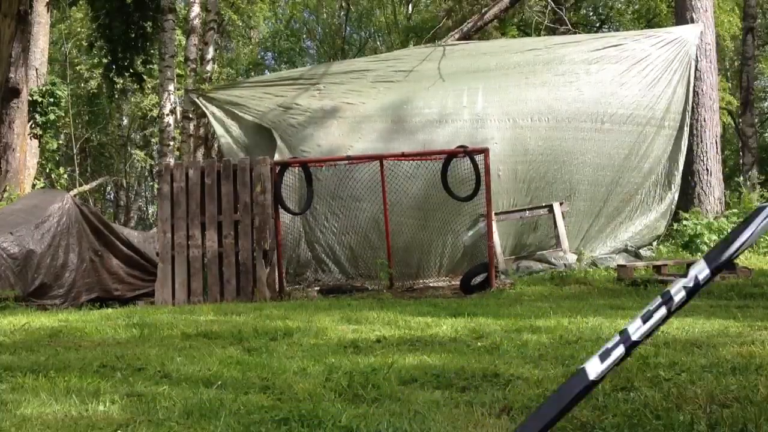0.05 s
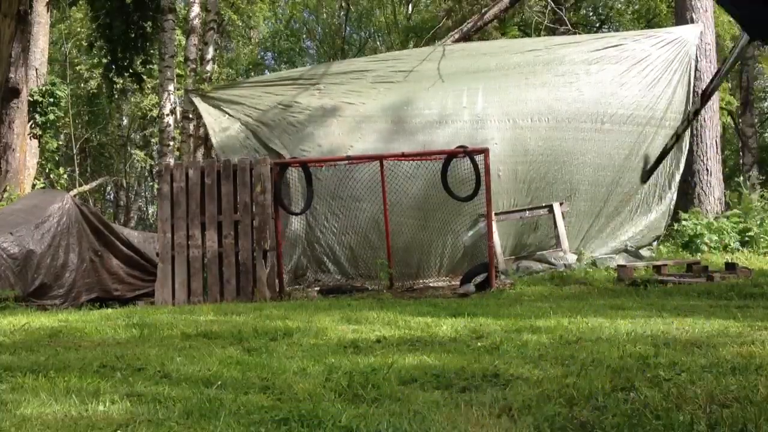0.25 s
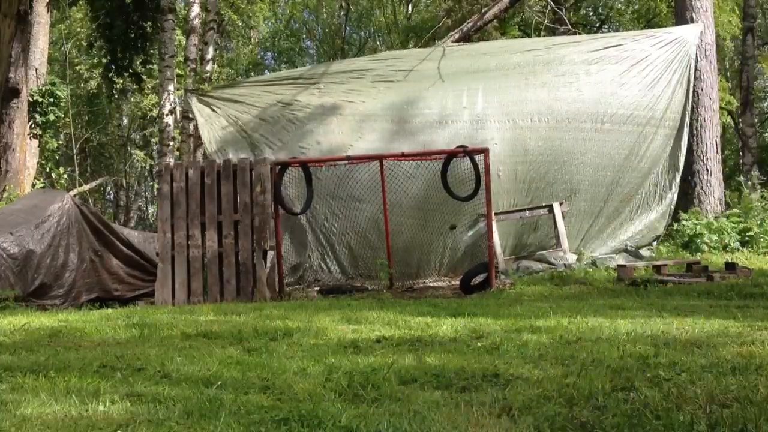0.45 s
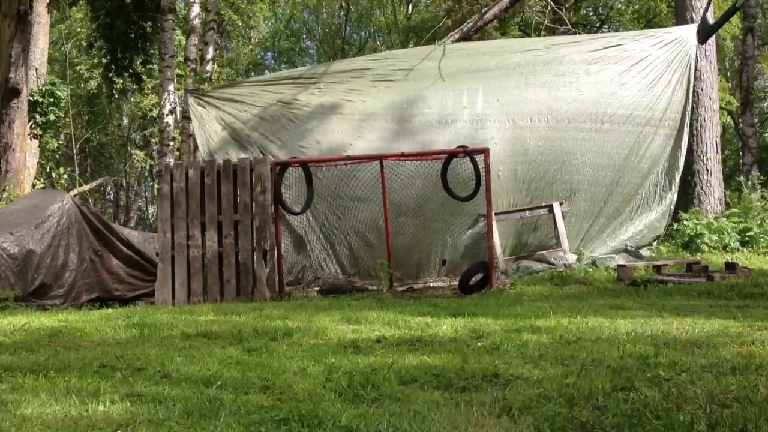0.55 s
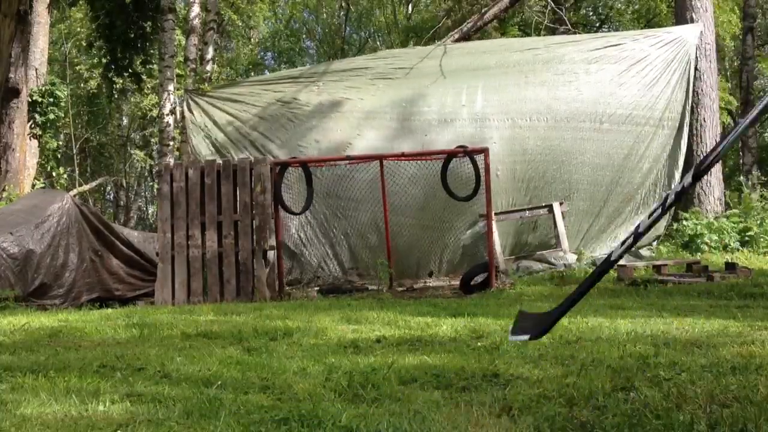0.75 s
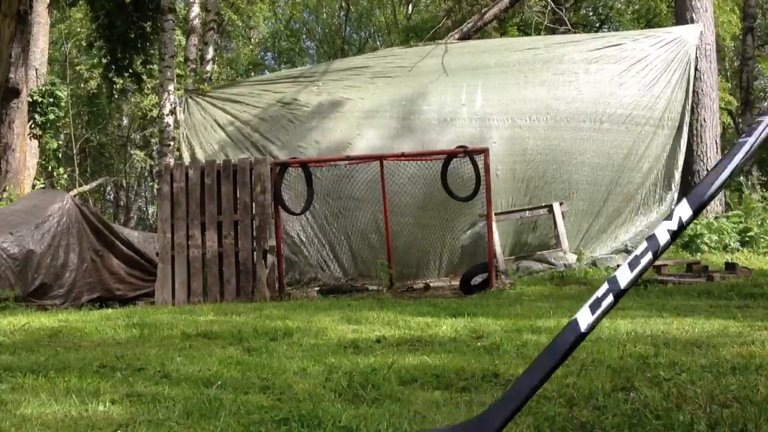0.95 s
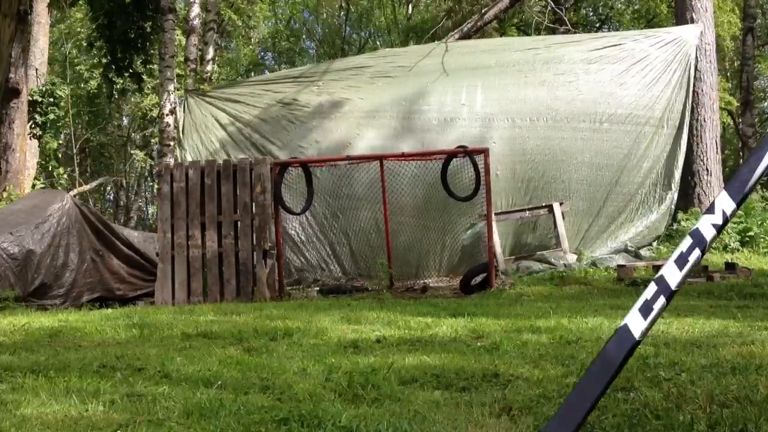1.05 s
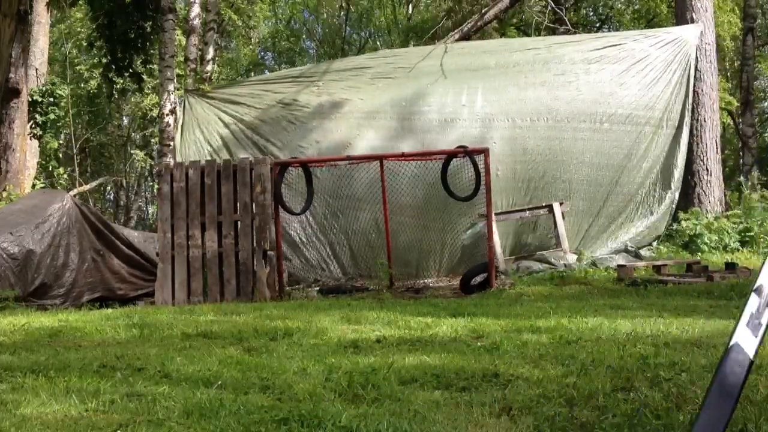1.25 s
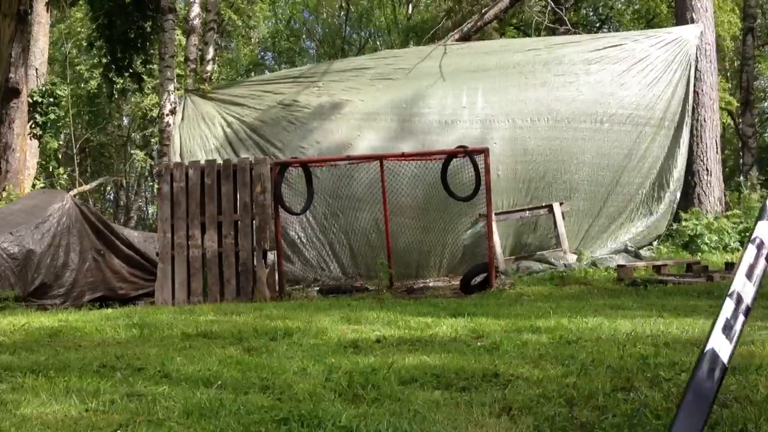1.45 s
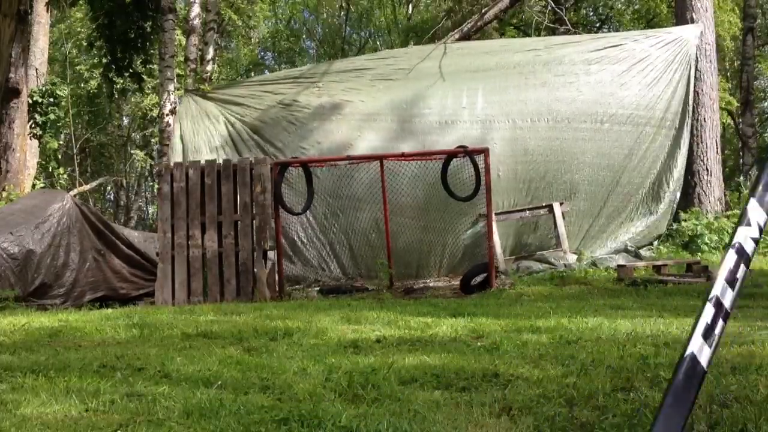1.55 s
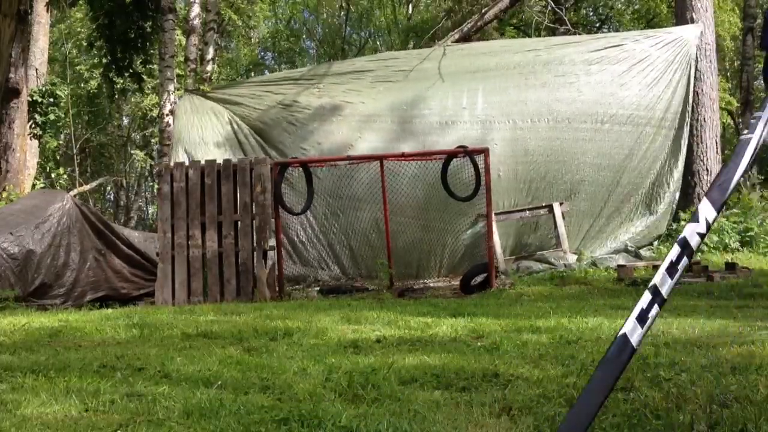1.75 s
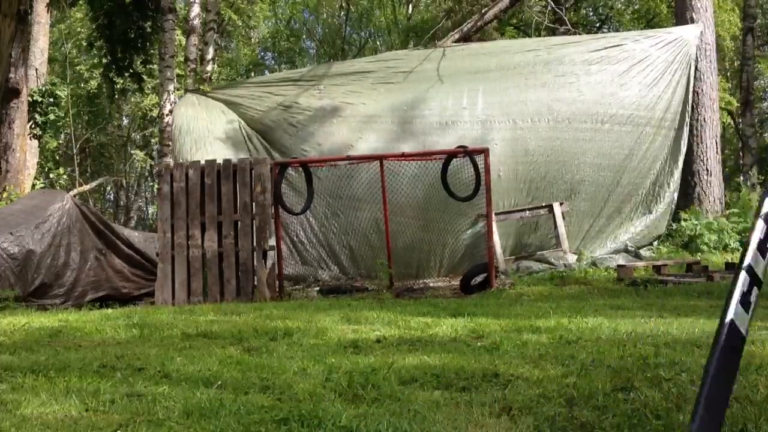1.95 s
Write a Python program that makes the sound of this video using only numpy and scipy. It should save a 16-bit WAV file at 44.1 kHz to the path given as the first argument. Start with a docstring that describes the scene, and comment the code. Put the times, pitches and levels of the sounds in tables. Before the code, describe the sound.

In a quiet yard, a close hockey stick scrapes briefly and cracks against a puck, which hits a rustling tarp farther off. Faint falling bird chirps follow as the stick clacks and scrapes the next puck into place.

```python
"""Backyard hockey shot

A stick blade sweeps a puck over a shooting pad, hissing with friction, and cracks down.
A third of a second later the puck slaps into a hanging tarp, which crinkles and rustles out.
The stick then knocks and drags the next puck into place. Fence and trees scatter the sound,
while a small bird repeats a falling chirp and another whistles faintly over the hush of leaves."""
import sys
import numpy as np
from scipy import signal
from scipy.fft import rfft, irfft, next_fast_len
from scipy.io import wavfile

SR = 44100
rng = np.random.default_rng(int(sys.argv[2]) if len(sys.argv) > 2 else 0)


def pcm_store(signal):
    """Save signal as 16-bit PCM."""
    levels = np.round(np.clip(np.atleast_2d(signal), -1, 1) * 32767)
    wavfile.write(sys.argv[1], SR, levels.astype(np.int16).T)


N = 88200
T = np.arange(N) / SR


def from_db(db):
    """Turn decibels into a number to multiply by."""
    return 10 ** (np.asarray(db) / 20)


def unit_power(x):
    """Scale a sound to an average power of 1."""
    return x / np.sqrt(np.mean(x ** 2) + 1e-20)


def level(rows):
    """Volume that follows (time [s], level [dB]) points and fades beyond both ends."""
    times, db = np.transpose(rows)
    outside_s = np.maximum(times[0] - T, 0) + np.maximum(T - times[-1], 0)
    return from_db(np.interp(T, times, db) - 110 * outside_s)


def colour(x, points):
    """Shape bass and treble to follow (frequency [Hz], level [dB]) points."""
    size = next_fast_len(2 * N)
    hz, db = np.transpose(points)
    grid_hz = np.maximum(np.arange(size // 2 + 1) * SR / size, 1)
    gain = from_db(np.interp(np.log(grid_hz), np.log(hz), db))
    # folding keeps the filter from sounding before its input does
    fold = irfft(np.log(gain), size)
    fold[1:size // 2] *= 2
    fold[size // 2 + 1:] = 0
    return irfft(rfft(x, size) * np.exp(rfft(fold)), size)[:N]


def cut_treble(x, hz, order=1):
    """Turn down what lies above hz."""
    return signal.sosfilt(signal.butter(order, hz, fs=SR, output="sos"), x + 1e-18)


def cut_bass(x, hz, order=2):
    """Turn down what lies below hz."""
    return signal.sosfilt(signal.butter(order, hz, "high", fs=SR, output="sos"), x + 1e-18)


def band(x, low_hz, high_hz, order=2):
    """Keep what lies between two frequencies."""
    return cut_treble(cut_bass(x, low_hz, order), high_hz, order=2)


def resonance(x, hz, width_hz):
    """Keep what lies near one pitch."""
    r = np.exp(-np.pi * width_hz / SR)
    feedback = [1, -2 * r * np.cos(2 * np.pi * hz / SR), r * r]
    return signal.lfilter([1, 0, -1], feedback, x + 1e-18) * (1 - r * r) / 2


def focus(x, hz, width_hz):
    """Resonate twice, for a clearer pitch."""
    return resonance(resonance(x, hz, width_hz), hz, width_hz)


def smear(x, hz, width_hz):
    """A flexing body spreads a click out in time."""
    return x - 2 * resonance(x, hz, width_hz)


def delay(x, seconds):
    """The same sound, later."""
    return np.interp(T - seconds, T, x, left=0)


def click(start):
    """A click one sample long."""
    return 1. * (np.arange(N) == int(start * SR))


def burst(start, fade_s):
    """A puff of noise. Here and below, a fade is the time taken to drop 60 dB."""
    fading = (T >= start) * from_db(-60 * np.maximum(T - start, 0) / fade_s)
    return unit_power(rng.standard_normal(N) * fading) / np.sqrt(N)


def ring(x, hz, fade_s):
    """Each click sets off a pure tone that dies away."""
    r = from_db(-60 / (fade_s * SR))
    feedback = [1, -2 * r * np.cos(2 * np.pi * hz / SR), r * r]
    return signal.lfilter([1, 0, -1], feedback, x / 2 + 1e-18)


def ring_tones(force, tones):
    """A struck object rings with all its own tones at once."""
    return sum(from_db(db) * ring(force, hz, fade_s) for hz, db, fade_s in tones)


def grains(per_s, spread_db, hiss):
    """Tiny random clicks of uneven size over a smooth hiss."""
    sizes = from_db(spread_db * np.minimum(rng.exponential(1, N), 4)) * rng.choice([-1, 1], N)
    clicks = sizes * (rng.random(N) < per_s / SR)
    return unit_power(unit_power(clicks) + hiss * rng.standard_normal(N))


# tone of the background hush (frequency [Hz], level [dB])
AIR_COLOUR = [(15, -76), (25, -34.5), (75, -19.5), (160, 6), (500, 1.5), (895, -4.5), (2770, -7.5),
              (3630, -4), (5140, -8.5), (7300, -10), (9810, -20.5), (14300, -13), (15500, -18)]
def air():
    """Leaves and distant air make a soft, steady noise."""
    return from_db(-68) * unit_power(colour(rng.standard_normal(N), AIR_COLOUR))


# the blade's high resonances (pitch [Hz], width [Hz], strength [times])
FRICTION_PEAKS = [(4200, 300, 0.82), (6580, 500, 1), (7500, 436, 0.17)]
def friction():
    """Rubbing on the pad makes tiny clicks, coloured by the blade."""
    grit = grains(per_s=2900, spread_db=2.0, hiss=0.67)
    return grit + sum(gain * resonance(grit, hz, width) for hz, width, gain in FRICTION_PEAKS)


# how loud the sweep is (time [s], level [dB])
SWEEP_LEVEL = [(0, -63), (0.041, -60.5), (0.048, -51.5), (0.07, -53.5), (0.098, -51), (0.106, -45),
               (0.15, -43.5), (0.18, -50.5), (0.208, -38), (0.228, -57.5), (0.259, -44), (0.286, -58),
               (0.34, -66.5), (0.42, -96)]
# tone of the sweep (frequency [Hz], level [dB])
SWISH_COLOUR = [(59, -42.5), (110, -10), (205, 0), (333, -1), (447, 5.5), (825, -4), (956, -2),
                (2100, -5.5), (6390, -1), (15500, -11)]
def sweep(grit):
    """The blade slides the puck along, sounding brighter the harder it presses."""
    swish = unit_power(colour(grit, SWISH_COLOUR))
    force, half_bright_force = level(SWEEP_LEVEL), from_db(-52.5)
    bright = force ** 2 / (force ** 2 + half_bright_force ** 2)
    return from_db(1) * force * (bright * swish + (1 - bright) * cut_treble(swish, hz=8000))


# tone of the scattered sound (frequency [Hz], level [dB])
SCATTER_COLOUR = [(50, 14), (200, 9.5), (450, 0.5), (1200, -1), (4000, 2.5), (14000, -2)]
def yard_scatter(sound):
    """Fence and trees send back a short blur of echoes."""
    echoes = colour(burst(start=0.014, fade_s=0.26), SCATTER_COLOUR)
    return from_db(-23) * signal.fftconvolve(sound, echoes)[:N]


# tone of the crack (frequency [Hz], level [dB])
CRACK_COLOUR = [(30, -33.5), (105, -25), (180, -11.5), (300, -8.5), (560, 1.5), (1100, -3.5), (1700, -14),
                (2500, -28.5), (3100, -4.5), (4200, -23), (8500, -18.5), (10000, -38.5), (15000, -33.5)]
# tones the blade rings with (pitch [Hz], level [dB], fade [s])
BLADE_TONES = [(227.7, -16.5, 0.028), (382, -13, .04), (558.4, -0.5, 0.057), (727, -8, .045),
               (848, -11, 0.13), (1060, -3.5, 0.04), (1455, -13.5, .03), (1932, -6.5, .036),
               (3130, 0, 0.014), (3563, -20.5, 0.046), (6430, -5.5, 0.015), (8130, -16.5, 0.013)]
# tone of the shot's rattle and of the later knocks (frequency [Hz], level [dB])
CONTACT_COLOUR = [(40, -36.5), (100, -28.5), (190, 1), (600, 0.5), (1500, -5.5), (2700, -9.5), (4200, -6),
                  (8000, -8.5), (15000, -29)]
SHOT_S, BOUNCE_GAP_S, BOUNCE_LOSS_DB = 0.2107, 0.00548, 6.5
def shot():
    """The blade slaps the pad, rings, rattles and bounces twice, weaker and duller each time."""
    hit = click(SHOT_S)
    touch = smear(hit, hz=5430, width_hz=3400)
    force = 0
    for bounce in range(3):
        force += from_db(-BOUNCE_LOSS_DB * bounce) * delay(touch, bounce * BOUNCE_GAP_S)
        touch = cut_treble(touch, hz=7620)
    crack = from_db(20) * colour(force, CRACK_COLOUR)
    ringing = from_db(-21.5) * ring_tones(hit, BLADE_TONES)
    rattle = from_db(6) * colour(burst(SHOT_S, fade_s=0.029), CONTACT_COLOUR)
    return crack + ringing + rattle


def fence_echo(sound):
    """The fence sends back one quiet, duller copy."""
    return from_db(-27.5) * cut_treble(delay(sound, seconds=0.0252), hz=9000)


# hits on the pad; a harder hit reaches a higher top (time [s], click [dB], bottom [Hz], top [Hz],
# ring [dB], rattle [dB], thud [dB], thud pitch [Hz])
PAD_HITS = [(0.256, -7, 1500, 12170, -74, -7.5, -39, 159), (0.277, -13, 1110, 1800, -48.5, -5, -37, 257),
            (1.2939, -4, 647, 1120, -49, -0.5, -46, 440), (1.2999, -1.5, 150, 446, -43.5, 0, -30.5, 264),
            (1.372, -6, 250, 3670, -60, -4, -36.5, 197), (1.3777, -1.5, 350, 2280, -56, -4, -31, 690),
            (1.3836, -1.5, 200, 1080, -43.5, 0, -45, 302), (1.510, -30, 297, 1670, -69, -21, -48, 477),
            (1.5540, -23, 100, 504, -60, -14.5, -46, 173), (1.7122, -0.5, 250, 1330, -38, 0.5, -27.5, 448),
            (1.7196, -10, 201, 1420, -47, 1, -33, 340), (1.729, -2, 400, 1310, -44, -2, -32.5, 280),
            (1.7442, 12, 1110, 2940, -26, 11, -47, 190), (1.7478, 6.5, 770, 2410, -43, 8.5, -20.5, 214),
            (1.7743, -9.5, 300, 4960, -51, -5, -30, 646), (1.7790, -16, 150, 600, -53, -2.5, -32.5, 250),
            (1.7980, -10, 300, 810, -45, -4, -41, 640), (1.9878, -22.5, 70, 178, -64.5, -36, -30.5, 174.5)]
# tones the pad rings with (pitch [Hz], level [dB], fade [s])
PAD_TONES = [(193.6, -5.5, 0.21), (252, -2.5, 0.13), (301, -4, 0.14), (570.5, -4, 0.12), (695, -7.5, 0.14),
             (898, -9.5, 0.045), (1053, -5, .06), (1127, -11, 0.11), (1425, 0, 0.032), (1572, 0.5, 0.04),
             (1865, -2, 0.038), (2080, -2, 0.047), (2335, -12.5, .045), (2650, -4, 0.027), (4250, -1, 0.03)]
def knocks():
    """Stick and puck hit the pad: each hit clicks, rattles, thuds and sets the pad ringing."""
    contact = force = thuds = 0
    for start, click_db, low_hz, top_hz, ring_db, rattle_db, thud_db, thud_hz in PAD_HITS:
        hit = click(start)
        touch = from_db(click_db) * hit + from_db(rattle_db) * burst(start, fade_s=0.048)
        grit = from_db(-19) * (touch - cut_treble(touch, hz=4000))
        contact += band(touch, low_hz, top_hz) + grit
        force += from_db(ring_db) * band(hit, low_hz, top_hz, order=1)
        thud = ring(hit, thud_hz, fade_s=0.035)
        thuds += from_db(thud_db) * band(thud, low_hz=109, high_hz=1.68 * thud_hz, order=1)
    clack = colour(contact, CONTACT_COLOUR) + ring_tones(force, PAD_TONES)
    return smear(clack, hz=1890, width_hz=1070) + thuds


# hits on the tarp and the net behind it (time [s], level [dB], pitch [Hz], fade [s])
TARP_HITS = [(0.539, -14, 5200, 0.012), (0.539, -21.5, 2850, 0.019), (0.5460, -27, 495, 0.04),
             (0.562, -11.5, 583, 0.016), (0.5631, -14, 3620, 0.025), (0.5819, -16.5, 555, 0.0098),
             (0.599, -16, 6160, 0.068), (0.699, -31.5, 192, 0.064), (0.9395, -30, 680, 0.069)]
def tarp_slaps():
    """The puck strikes tarp and net in short, papery bursts."""
    slaps = 0
    for start, db, hz, fade_s in TARP_HITS:
        papery = focus(burst(start, fade_s), hz, width_hz=0.67 * hz)
        slaps += from_db(db) * unit_power(cut_bass(papery, 0.32 * hz)) / np.sqrt(N)
    return slaps


# how loud the tarp's hiss and its flapping are (time [s], level [dB])
HISS_LEVEL = [(0.543, -44.5), (0.556, -41.5), (0.578, -42), (0.602, -39), (0.67, -47.5), (0.77, -60),
              (1.0, -77.5)]
FLAP_LEVEL = [(0.545, -50), (0.567, -44), (0.62, -46.5), (0.68, -52.5), (0.78, -64.5), (0.92, -79)]
# tone of each (frequency [Hz], level [dB])
CRINKLE_COLOUR = [(1180, -34), (2100, -5.5), (3260, -8), (3800, -1.5), (5130, -4), (7290, -3.5),
                  (14600, -21.5), (15500, -29)]
FLAP_COLOUR = [(53, -39), (90, -28.5), (256, -0.5), (386, -12.5), (552, -8.5), (707, -7.5), (905, -2),
               (1290, -6.5), (2400, -25), (3120, -25), (5280, -120)]
TARP_S, CRINKLES_PER_S, DULLING_S = 0.539, 4400, 0.25
def tarp_rustle():
    """The sheet flaps, and a wave of crinkles dulls as it runs out over it."""
    crinkles = grains(CRINKLES_PER_S, spread_db=-0.5, hiss=0.62)
    hiss = unit_power(colour(crinkles, CRINKLE_COLOUR))
    bright = np.exp(-np.maximum(T - TARP_S, 0) / DULLING_S)
    hiss = bright * hiss + (1 - bright) * cut_treble(hiss, hz=6960)
    flap = unit_power(colour(grains(CRINKLES_PER_S, spread_db=0.5, hiss=0.61), FLAP_COLOUR))
    rustle = from_db(-0.5) * level(HISS_LEVEL) * hiss + from_db(-2) * level(FLAP_LEVEL) * flap
    return (T >= TARP_S) * rustle


# how loud the far rustle is (time [s], level [dB])
FAR_RUSTLE_LEVEL = [(0.72, -85), (0.83, -62), (0.91, -73), (0.99, -66.5), (1.11, -64), (1.2, -86.5)]
def far_rustle():
    """A faint, hollow rustle lingers at the far end of the yard after the tarp is hit."""
    hollow = focus(rng.standard_normal(N), hz=845, width_hz=360)
    return level(FAR_RUSTLE_LEVEL) * unit_power(hollow)


def whistle(start, length, start_hz, end_hz):
    """One wavering bird note: it glides, fast at first, while it swells and fades."""
    progress = np.clip((T - start) / length, 0, 1)
    waver_hz = 55 * unit_power(cut_treble(rng.standard_normal(N), hz=250, order=2))
    flutter_db = 4 * unit_power(cut_treble(rng.standard_normal(N), hz=250, order=2))
    hz = end_hz + (start_hz - end_hz) * (1 - progress) ** 1.6 + waver_hz
    swell = np.abs(np.sin(np.pi * progress)) ** 1.17
    return from_db(flutter_db) * swell * np.sin(2 * np.pi * np.cumsum(hz) / SR)


# two-part chirps (time [s], fall from [Hz], fall to [Hz], fall [dB], tail pitch [Hz], tail [dB])
BIRD_CHIRPS = [(0.880, 4900, 3280, -68.5, 3830, -77), (1.037, 4800, 3070, -64, 3630, -69),
               (1.188, 4950, 2946, -60.5, 3580, -60.5), (1.355, 5065, 2970, -56.5, 3450, -59),
               (1.5172, 4825, 2720, -57, 3130, -58), (1.677, 4800, 2620, -50, 3070, -59),
               (1.838, 4800, 2654, -54, 3110, -54.5)]
FALL_S, TAIL_AFTER_S, TAIL_S, TAIL_RISE_HZ = 0.04, 0.041, 0.024, 180
def near_bird():
    """A small bird's chirps sink and grow louder; each is a fall, then a slightly rising tail."""
    song, half_rise = 0, TAIL_RISE_HZ / 2
    for start, top_hz, low_hz, fall_db, tail_hz, tail_db in BIRD_CHIRPS:
        fall = whistle(start, FALL_S, top_hz, low_hz)
        tail = whistle(start + TAIL_AFTER_S, TAIL_S, tail_hz - half_rise, tail_hz + half_rise)
        song += from_db(fall_db) * fall + from_db(tail_db) * tail
    return song


def tree_scatter(song):
    """The trees give birdsong a soft trail of echoes."""
    return from_db(-6) * signal.fftconvolve(song, burst(start=0.0067, fade_s=0.64))[:N]


# distant calls (time [s], length [s], from [Hz], to [Hz], level [dB])
FAR_WHISTLES = [(1.465, 0.041, 4490, 4560, -67), (1.954, 0.042, 3890, 4280, -63.5)]
def far_bird():
    """A second bird, farther off, whistles faint rising notes."""
    return sum(from_db(db) * whistle(start, length, from_hz, to_hz)
               for start, length, from_hz, to_hz, db in FAR_WHISTLES)


# how loud the drag and its squeal are (time [s], level [dB])
DRAG_LEVEL = [(1.61, -75), (1.636, -59.5), (1.66, -55.5), (1.685, -54), (1.708, -44.5), (1.718, -46.5),
              (1.735, -73), (1.85, -72.5)]
SQUEAL_LEVEL = [(1.638, -80), (1.655, -54.5), (1.71, -52), (1.73, -61)]
# tone of the drag (frequency [Hz], level [dB])
SCRAPE_COLOUR = [(59, -44.5), (100, -14.5), (758, -12), (1110, -10.5), (2470, -14.5), (2990, -12.5),
                 (3320, -12.5), (4280, -18.5), (15500, -27)]
def drag(grit):
    """The blade scrapes the next puck into place with a thin squeal."""
    scrape = unit_power(colour(grit, SCRAPE_COLOUR))
    squeal = unit_power(focus(rng.standard_normal(N), hz=3070, width_hz=93))
    return from_db(1.5) * level(DRAG_LEVEL) * scrape + level(SQUEAL_LEVEL) * squeal


def scene():
    """Add up stick, yard, tarp and birds in one channel."""
    crack, grit = shot(), friction()
    stick = sweep(grit) + crack + drag(grit) + knocks()
    yard = fence_echo(crack) + yard_scatter(stick) + air()
    tarp = tarp_slaps() + tarp_rustle() + far_rustle()
    birds = near_bird() + far_bird()
    return (stick + yard + tarp + birds + tree_scatter(birds))[None]


def record(dry):
    """Drop the deep bass, round off the loudest peak and cut the highest treble."""
    rounded = np.tanh(cut_bass(dry, hz=55))
    top_cut = signal.cheby1(12, 0.2, 15200, fs=SR, output="sos")
    return signal.sosfilt(top_cut, rounded)


dry = scene()
out = record(dry)
pcm_store(out)
```